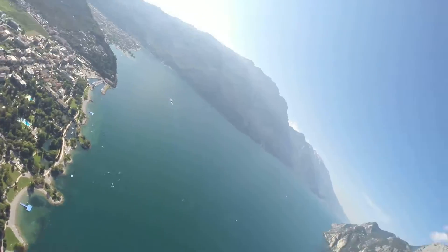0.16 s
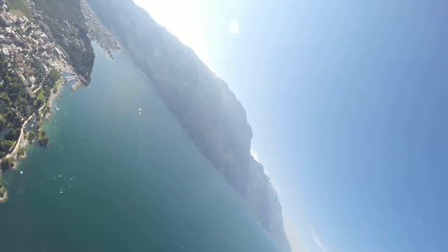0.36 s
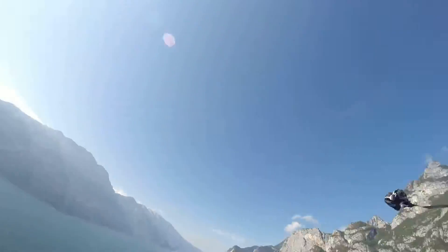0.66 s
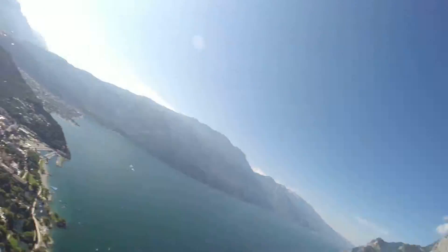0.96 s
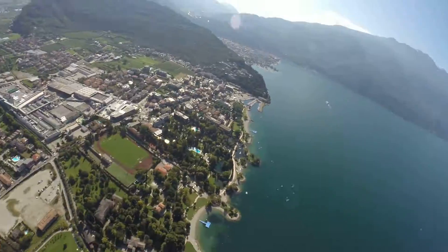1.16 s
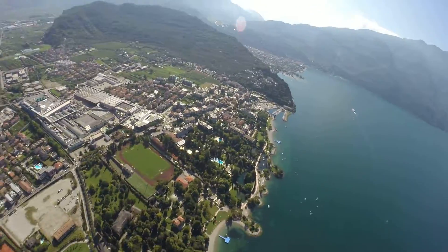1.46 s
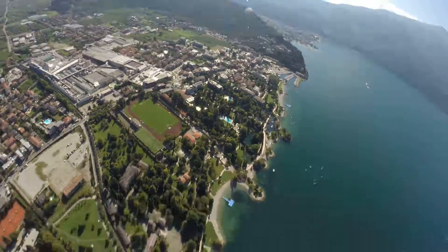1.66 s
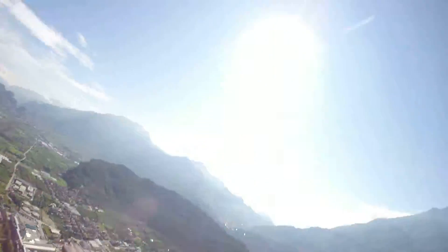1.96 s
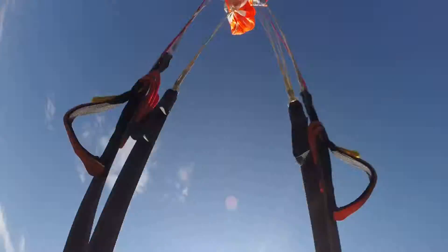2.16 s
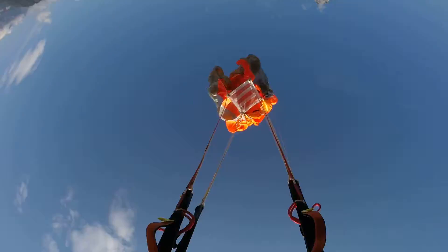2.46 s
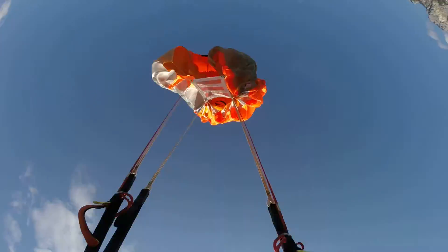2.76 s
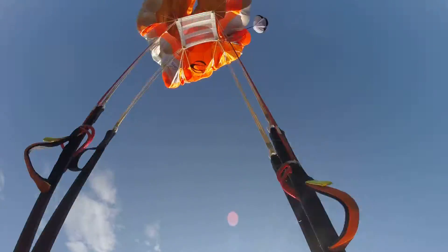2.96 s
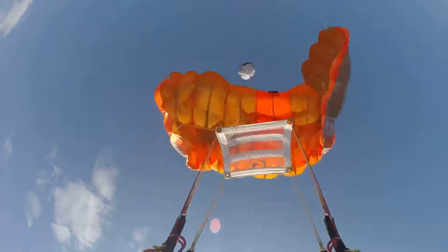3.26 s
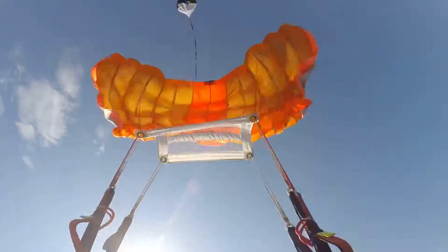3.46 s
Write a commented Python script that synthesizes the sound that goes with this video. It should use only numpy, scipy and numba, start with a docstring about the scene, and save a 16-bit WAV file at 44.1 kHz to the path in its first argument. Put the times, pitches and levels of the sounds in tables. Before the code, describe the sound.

Loud wind roar in fast flight, then cloth flaps, a sharp parachute snap and softer rush

```python
"""Helmet camera in fast flight, canopy opening

Wind noise roars through the resonances of the camera housing, a whistle sings, and eddies buffet the capsule.
The jumper is swung upright, cloth and lines flap as short noise bursts, and a double snap rings the housing.
The snap overloads the camera; its gain control ducks and comes back on a softer rush under the canopy.
"""
import sys
import numpy as np
from scipy import signal
from scipy.fft import rfft, irfft
from scipy.io import wavfile
from scipy.ndimage import uniform_filter1d
from numba import njit

SR = 44100
rng = np.random.default_rng(int(sys.argv[2]) if len(sys.argv) > 2 else 0)


def master_out(mix):
    """Clip the mix to full scale and print it as 16-bit PCM to the path in sys.argv[1]."""
    frames = np.transpose(np.atleast_2d(mix))
    ceiling = np.clip(frames, -1, 1)
    pcm = np.round(ceiling * 32767).astype(np.int16)
    wavfile.write(sys.argv[1], SR, pcm)


N = 158760  # samples, 3.6 s
TIME = np.arange(N) / SR  # seconds


def undb(db):
    """dB to gain."""
    return 10 ** (np.asarray(db) / 20)


def unit(x):
    """Scale to rms 1."""
    return x / np.sqrt(np.mean(x ** 2))


def column(tables, order):
    """One column of consecutive curve tables, interpolated sample by sample."""
    rows = np.vstack(tables)
    return np.interp(TIME, rows[:, 0], rows[:, order])


def walk(rate):
    """Random levels held 1 / rate seconds and smoothed twice into slopes; rms 1."""
    hold = int(SR / rate)
    steps = np.repeat(rng.standard_normal(N // hold + 1), hold)
    slopes = uniform_filter1d(uniform_filter1d(steps, hold), hold)
    return unit(slopes[:N])


def fade_gate(start, end, fade_s):
    """Gate open from start to end, with straight fades inside."""
    return np.clip(np.minimum(TIME - start, end - TIME) / fade_s, 0, 1)


def lowpass(x, order, hz):
    """Butterworth low-pass."""
    return signal.sosfilt(signal.butter(order, hz, fs=SR, output="sos"), x)


def air(colour, edges, flicker_db, rate):
    """Coloured noise between the outer edges (Hz), each slice flickering on its own; rms 1."""
    freq = np.fft.rfftfreq(N, 1 / SR) + 1e-9  # keeps the log finite at 0 Hz
    points = np.array(colour)
    colour_db = np.interp(np.log(freq), np.log(points[:, 0]), points[:, 1])
    spectrum = rfft(rng.standard_normal(N)) * undb(colour_db)
    total = np.zeros(N)
    for low, high in zip(edges, edges[1:]):
        part = irfft(spectrum * (freq >= low) * (freq < high), N)
        total += part * undb(flicker_db * walk(rate))
    return unit(total)


def bands(colour, flicker_db):
    """Main, lower and treble parts of air noise heard through the housing, each at rms 1."""
    main = (2150, 2700, 3300, 4200)
    lower = (800, 1150, 1600, 2150)
    treble = (4200, 5500, 6500, 8500, 11500, 16000)
    return np.array([air(colour, edges, flicker_db, 26.06) for edges in (main, lower, treble)])


# Colour of the rush in flight. Each row: frequency in Hz, relative density in dB per Hz.
FLIGHT_COLOUR = [(470, -30), (650, -28.5), (880, -11), (1010, -8), (1430, -7), (1640, -8), (1990, -8.5),
                 (2520, -1.5), (2780, -4), (3100, 0.5), (3510, -0.5), (4120, -16), (4530, -11.5),
                 (4850, -17), (5250, -17), (5650, -21), (6000, -16), (6550, -28.5), (7060, -22.5),
                 (8420, -30), (9650, -26), (11500, -39), (14000, -42.5), (15200, -54)]
# Colour once hanging upright. Each row: frequency in Hz, relative density in dB per Hz.
UPRIGHT_COLOUR = [(470, -30), (800, -10.5), (1000, -7.5), (1560, -0.5), (2000, -4), (2250, 0), (3100, -0.5),
                  (3600, -5.5), (4050, -21.5), (4600, -15.5), (5050, -22.5), (5500, -17.5), (6200, -26),
                  (7600, -30.5), (8300, -32.5), (9500, -35.5), (11500, -46), (13600, -49.5), (15200, -67.5)]
# Course of the wind rush. Each row: time in seconds, main band level in dB,
# lower part relative to it in dB, treble relative to it in dB.
RUSH_CURVE = [
    [(0, -14, -9, -14.5), (.07, -13, -11, -15), (.17, -18, -6.5, -15.5), (.47, -21, -1, -11.5),
     (.55, -19, -2.5, -14.5), (.67, -19, -8, -10.5), (.8, -18.5, -9, -15), (1.0, -18, -7, -13),
     (1.1, -14, -8.5, -18.5), (1.24, -18, -11, -17), (1.3, -19.5, -4, -11), (1.45, -17.5, -7.5, -11),
     (1.65, -22, -3.5, -12.5), (1.78, -22.5, -2, -15.5), (1.82, -30, -9, -14), (1.85, -37, 3, -16),
     (1.94, -25.5, -5, -19), (1.98, -33.5, 3, -12), (2.02, -24, -6.5, -16.5), (2.05, -38.5, -0.5, -18),
     (2.15, -38, -0.5, -14), (2.175, -39.5, -2, -16), (2.235, -31.5, -2, -18), (2.26, -43, 2, -16.5),
     (2.36, -38, -4.5, -16.5), (2.42, -36.5, -4, -15), (2.44, -31.5, 2, -9.5), (2.47, -29.5, 2, -11),
     (2.495, -32, -2, -13), (2.53, -42.5, 2, -11), (2.7, -43, -6, -16.5), (2.83, -40.5, -5, -18),
     (3.05, -39, -4.5, -15.5), (3.2, -34, -3, -18), (3.32, -32.5, -1, -18), (3.44, -34.5, -6, -15.5),
     (3.53, -31, -3.5, -16.5), (3.6, -33.5, -2.5, -19)],
]
UPRIGHT_S, TURN_S = 2.04, 0.016  # start and length of the swing upright
# Rms of the level movements, slowest swell to finest grain; OWN_DB is per frequency slice
SWELL_DB, SHARED_DB, OWN_DB, GRAIN_DB = 0.25, 0.26, 0.87, 1
FLUTTER_DB, FLUTTER_HZ = 1.4, 49.76  # loose cloth: rms, and new random levels per second


def rush():
    """Turbulent air over the housing: its bands swell together, with a fine grain of small eddies."""
    angle = np.clip((TIME - UPRIGHT_S) / TURN_S, 0, 1) * np.pi / 2
    upright = np.sin(angle)
    main, low, high = np.cos(angle) * bands(FLIGHT_COLOUR, OWN_DB) + upright * bands(UPRIGHT_COLOUR, OWN_DB)
    level_db = column(RUSH_CURVE, order=1)
    level_db = level_db + SWELL_DB * walk(6.4) + SHARED_DB * walk(29.88) + GRAIN_DB * walk(250)
    # loose cloth makes the rush flutter once upright
    level_db = level_db + FLUTTER_DB * upright * walk(FLUTTER_HZ)
    low_gain = undb(column(RUSH_CURVE, order=2))
    high_gain = undb(column(RUSH_CURVE, order=3))
    return undb(level_db) * (main + low_gain * low + high_gain * high)


# Bands of the rush that come and go as the head turns. Each row: start in seconds, end in seconds,
# centre in Hz, width in Hz, lift or cut in dB.
HEAD_TURNS = [(1.76, 1.99, 1780, 420, -3.5), (0.53, 1.21, 1800, 750, -5), (0.092, 0.6, 2500, 500, 2),
              (0.52, 1.15, 4730, 330, -18), (0.65, 1.33, 6170, 400, 4), (1.24, 1.6, 4400, 300, -3.5),
              (1.4, 1.95, 4400, 350, 3)]
TURN_FADE_S = 0.078


def turned(x):
    """The turning head changes the colour of the wind: a resonant filter lifts or sinks a band for a while."""
    for start, end, hz, width_hz, db in HEAD_TURNS:
        band = signal.lfilter(*signal.iirpeak(hz, hz / width_hz, fs=SR), x)
        x = x + fade_gate(start, end, TURN_FADE_S) * (undb(db) - 1) * band
    return x


# Colour of the buffeting. Each row: frequency in Hz, relative density in dB per Hz.
RUMBLE_COLOUR = [(8.8, -23), (15, -7.5), (48, -13.5), (80, 2.5), (94, -3), (123, -17), (177, -17),
                 (395, -22), (486, -25), (826, -26.5), (900, -23), (1170, -53), (1980, -120)]
# Course of the thudding, in three stretches. Each row: time in seconds, thud level in dB,
# deepest part relative to it in dB.
THUD_CURVE = [
    [(0.0, -28.5, -2), (0.136, -30.5, -5), (0.156, -21.5, -13), (0.534, -28, -17), (0.596, -27, 3),
     (0.62, -42, -2), (0.742, -17, -12), (0.832, -25, -7), (0.946, -17, -28), (0.96, -21.5, -5),
     (1.116, -19, -19), (1.144, -39, 10.5), (1.43, -21, -23), (1.472, -33, 0.5), (1.67, -28.5, -5),
     (1.7, -33, 5)],
    [(1.7, -45, 0), (1.708, -47, 11), (1.814, -12, -3), (1.89, -33.5, 7), (1.958, -21.5, 1),
     (2.006, -25, -3), (2.048, -16, -10), (2.122, -16, -2), (2.164, -20.5, -2), (2.21, -11.5, -17),
     (2.244, -29, 11.5), (2.27, -25.5, -6.5), (2.394, -26.5, 11), (2.424, -26, 7.5), (2.486, -14.5, 3),
     (2.5, -25, -6.5)],
    [(2.72, -28.5, -1), (2.744, -17, -17), (2.776, -42.5, 15.5), (2.856, -27, -6.5), (2.96, -26.5, -1.5),
     (2.982, -45, 18), (2.996, -31, 10), (3.084, -20.5, -15), (3.104, -30.5, 9), (3.286, -21.5, -2),
     (3.304, -28, 4), (3.34, -13.5, -3.5), (3.454, -31.5, 2), (3.514, -19.5, 6.5), (3.558, -36, 6),
     (3.6, -25, -3)],
]
# Course of the rumble above the thuds, in three stretches. Each row: time in seconds, level in dB.
UPPER_CURVE = [
    [(0.0, -29), (0.014, -29.5), (0.306, -31), (0.51, -26), (0.59, -30.5), (1.002, -29.5), (1.078, -23.5),
     (1.144, -36.5), (1.4, -31), (1.646, -33.5), (1.7, -34)],
    [(1.7, -29.5), (1.814, -31.5), (1.826, -46), (1.874, -34.5), (2.102, -30), (2.174, -39.5), (2.186, -32),
     (2.402, -40.5), (2.46, -22), (2.486, -39.5), (2.495, -32.5)],
    [(2.72, -56.5), (2.76, -49.5), (2.8, -48), (2.924, -49), (2.944, -40.5), (2.996, -47), (3.31, -39.5),
     (3.352, -33.5), (3.42, -44), (3.592, -38), (3.6, -47)],
]


def buffet():
    """Large eddies shake the capsule: a deep thudding and a rumble above it."""
    deep = air(RUMBLE_COLOUR, (8, 52), 1.0, 12)
    thud = air(RUMBLE_COLOUR, (52, 140), 1.0, 12)
    upper = air(RUMBLE_COLOUR, (130.0, 216, 430, 796), 1.52, 25.15)
    upper = unit(upper * undb(0.38 * walk(90)))
    body = undb(column(THUD_CURVE, order=1)) * (thud + undb(column(THUD_CURVE, order=2)) * deep)
    return body + undb(column(UPPER_CURVE, order=1)) * upper


# Harness jolts. Each row: centre in seconds, peak in dB, half length in seconds.
HARNESS_JOLTS = [(1.76, -8, .012), (1.811, -8, 0.0041), (2.058, -4.5, 0.0046), (2.102, -12, .004),
                 (2.121, -18, 0.0064), (2.2, -15, 0.005), (2.4, -12, 0.015), (2.432, -2.5, 0.0039),
                 (2.46, -11, 0.001), (2.48, -14.5, 0.0029), (2.4965, -14, 0.0024), (2.508, -6.5, 0.0032),
                 (3.33, -16.5, 0.0031)]


def jolts():
    """The harness jerks the capsule: a downward pulse with a smaller upward lobe on either side."""
    out = np.zeros(N)
    for centre, db, half_s in HARNESS_JOLTS:
        square = ((TIME - centre) / half_s) ** 2
        out -= undb(db) * (1 - 2 * square) * np.exp(-square)
    return out


# The two blows on the housing. Each row: start in seconds, level in dB, treble relative to it in dB.
BLOWS = [(2.5003, 2, 0.5), (2.5102, 30.5, -17)]
# Modes of the struck housing. Each row: frequency in Hz, level in dB, 60 dB decay time in seconds.
SHELL_MODES = [(1350, -18.5, .005), (1740, -0.5, 0.007), (2160, -19.5, 0.029), (2327, 7, 0.0082),
               (2616, -4, 0.0093), (3480, -14.5, 0.0092), (4130, -11, 0.013), (4930, -9, 0.01),
               (5420, -4, 0.0064), (6560, -12.5, 0.0067), (6900, -24.5, .007), (8900, -17, 0.0044)]
RISE_S = 0.0031  # swell time of the first mode; higher modes swell faster in proportion
PUSH_S, PUSH_DB = 0.00031, -26.5
CRACK_S, CRACK_DB = 0.002, -31.5


def snap():
    """Two blows on the housing: a push, a crack, and modes that swell over a few of their own cycles."""
    out = np.zeros(N)
    noise = lowpass(rng.standard_normal(N), 2, 8000)
    for start, db, high_db in BLOWS:
        since = np.maximum(TIME - start, 0)
        shell = np.zeros(N)
        for hz, mode_db, t60 in SHELL_MODES:
            decay = undb(mode_db + high_db * (hz > 4000) - 60 * since / t60)
            swell = 1 - np.exp(-since / RISE_S * hz / SHELL_MODES[0][0])
            shell += decay * swell * np.sin(2 * np.pi * hz * since)
        # the push peaks just before the modes start
        push = -undb(PUSH_DB) * np.exp(-((TIME - start + PUSH_S) / PUSH_S) ** 2)
        crack = undb(CRACK_DB + high_db) * noise * (since > 0) * np.exp(-since / CRACK_S)
        out += undb(db) * (shell + push + crack)
    return out


# Cloth and line flaps. Each row: start in seconds, level in dB, lower part relative to it in dB,
# treble relative to it in dB, decay in seconds.
CLOTH_FLAPS = [(1.221, -6.5, -25, -21, 0.0034), (1.7976, -14, -26, -6, 0.0051),
               (1.925, -21, -13, -26, 0.0042), (1.9454, -18.5, -24, -21, 0.005),
               (2.0244, -21, -11, -14, 0.0053), (2.0405, -17.5, -19, -19, 0.0055),
               (2.0845, -27, 0.5, -10, 0.0038), (2.1045, -24, 6, -11.5, 0.0048),
               (2.128, -27, -8, -18, 0.016), (2.1947, -17, -11, -14, 0.0061),
               (2.2015, -23, -18, -22, 0.0064), (2.2229, -23, -5, -16, 0.0058),
               (2.292, -26.5, -5, -16.5, 0.007), (2.338, -28.5, -10, -15, 0.0071),
               (2.366, -32.5, -10, -22, 0.008), (2.3915, -33.5, -8, -22, 0.014),
               (2.436, -24, 5, -14, 0.0038), (2.457, -25.5, 5, -12, .004),
               (2.4603, -21.5, 2.5, -11, 0.0027), (2.467, -27, -3, -21, .003),
               (2.478, -18, -6, -13.5, 0.0026), (2.4905, -26, -13, -10, .003),
               (2.697, -29.5, -24, -15, 0.0054), (2.9314, -31, 2, -15, 0.0093),
               (3.232, -21, -8, -27, 0.0056), (3.269, -21, -12, -16.5, 0.0082),
               (3.521, -25, 2, -29, 0.0062)]
FLAP_ATTACK_S = 0.0013


def flaps():
    """Cloth and lines slap the air: each flap is a short, grainy burst of air noise."""
    envelopes = np.zeros((3, N))
    for start, db, low_db, high_db, decay_s in CLOTH_FLAPS:
        since = np.maximum(TIME - start, 0)
        shape = (1 - np.exp(-since / FLAP_ATTACK_S)) * np.exp(-since / decay_s)
        envelopes += shape * undb(db + np.array([[0], [low_db], [high_db]]))
    grain = unit(undb(2.7 * walk(500)))
    return np.sum(envelopes * bands(UPRIGHT_COLOUR, 0), axis=0) * grain


# Breathy whistle. Each row: time in seconds, level in dB, centre pitch in Hz.
WHISTLE_CURVE = [(1.25, -26, 1380), (1.31, -21.5, 1298), (1.42, -27.5, 1266), (1.559, -30, 1341),
                 (1.7, -22.5, 1290), (1.81, -32.5, 1229), (1.9, -33, 1170), (2.04, -34, 1112)]
WHISTLE_WIDTH_HZ, WHISTLE_FADE_S = 170, 0.033
WHISTLE_PAIR = 0.12  # the two bands lie this share below and above the centre


def whistle():
    """Air across an edge sings two narrow bands of noise: slow noise carried on a gliding pitch."""
    out = np.zeros(N)
    for share in (1 - WHISTLE_PAIR, 1 + WHISTLE_PAIR):
        slow = lowpass(rng.standard_normal((2, N)), 3, WHISTLE_WIDTH_HZ / 2)
        phase = 2 * np.pi * np.cumsum(share * column([WHISTLE_CURVE], order=2)) / SR
        band = unit(slow[0] * np.cos(phase) + slow[1] * np.sin(phase))
        out += band * undb(1.0 * walk(15))
    gate = fade_gate(WHISTLE_CURVE[0][0], WHISTLE_CURVE[-1][0], WHISTLE_FADE_S)
    return unit(out) * undb(column([WHISTLE_CURVE], order=1)) * gate


def scene():
    """All layers at the capsule."""
    wind = turned(rush()) + buffet() + jolts()
    return (wind + snap() + flaps() + whistle())[None]


@njit
def follow(x, attack, hold, release):
    """Peak envelope: a hold, then an exponential fall, all smoothed by a quick attack."""
    out, envelope, peak, wait = np.empty(len(x)), 0., 0., 0.
    for i in range(len(x)):
        if abs(x[i]) > peak:
            peak, wait = abs(x[i]), hold
        elif wait > 0:
            wait -= 1
        else:
            peak *= 1 - release
        envelope += (peak - envelope) * attack
        out[i] = envelope
    return out


CAPSULE_HZ = 6500


def overload(x, top):
    """Peaks clip, and the clipped corners lose their treble."""
    excess = x - np.clip(x, -top, top)
    return x - signal.sosfiltfilt(signal.butter(3, CAPSULE_HZ, fs=SR, output="sos"), excess)


def ring(x, hz, t60):
    """A decaying mode driven by x, with about unity gain at its own frequency."""
    pole = np.exp(2j * np.pi * hz / SR - np.log(1000) / (t60 * SR))
    mode = signal.lfilter([1], [1, -pole], x).imag
    return mode * np.log(1000) / (t60 * SR) * 2


AGC_TOP = 0.93  # envelope level above which the gain ducks
AGC_ATTACK_S, AGC_HOLD_S, AGC_RELEASE_S = 0.0035, 0.097, 0.037
BASS_HZ, BASS_T60_S, BASS_DB = 79.3, 0.32, -1.5
HISS_DB = -79
TOP_HZ = 15300  # upper limit of the camera sound


def record(dry):
    """Gain control ducks after overloads; peaks clip and lose their top; a bass resonance rings on."""
    envelope = follow(dry[0], 1 / (AGC_ATTACK_S * SR), AGC_HOLD_S * SR, 1 / (AGC_RELEASE_S * SR))
    x = dry[0] * AGC_TOP / np.maximum(envelope, AGC_TOP)
    x = overload(x, 0.7)
    x = x + undb(BASS_DB) * ring(x, BASS_HZ, BASS_T60_S)
    x = overload(x, 0.92) + undb(HISS_DB) * rng.standard_normal(N)
    return signal.sosfilt(signal.ellip(12, 0.2, 90, TOP_HZ, fs=SR, output="sos"), x)[None]


dry = scene()
out = record(dry)
master_out(out)
```